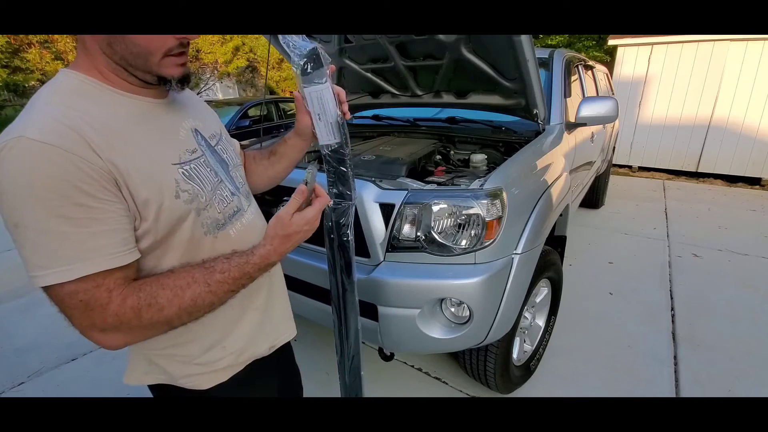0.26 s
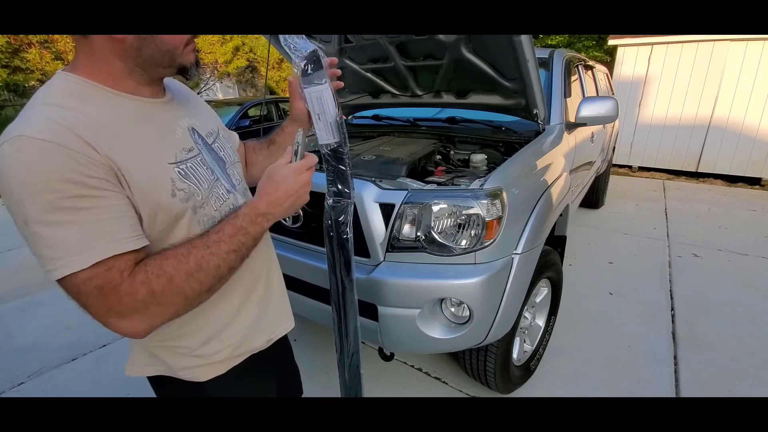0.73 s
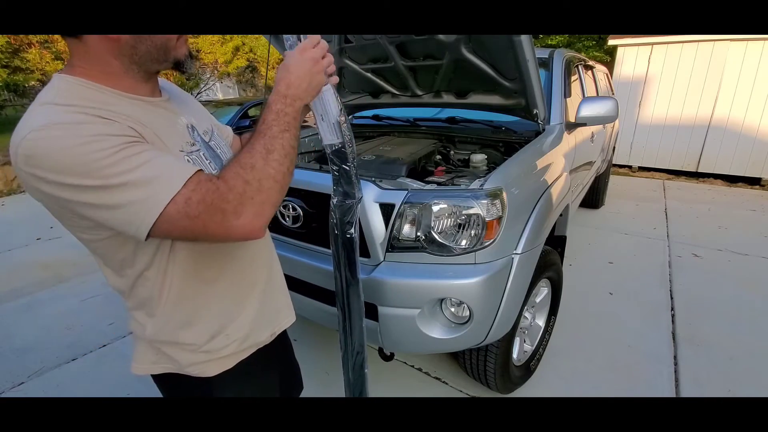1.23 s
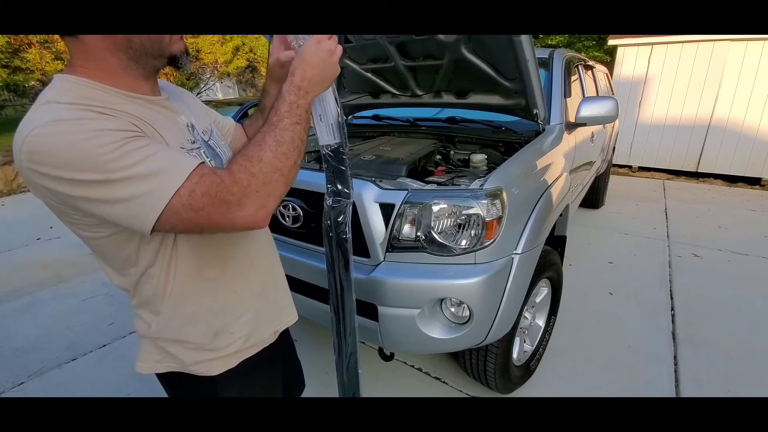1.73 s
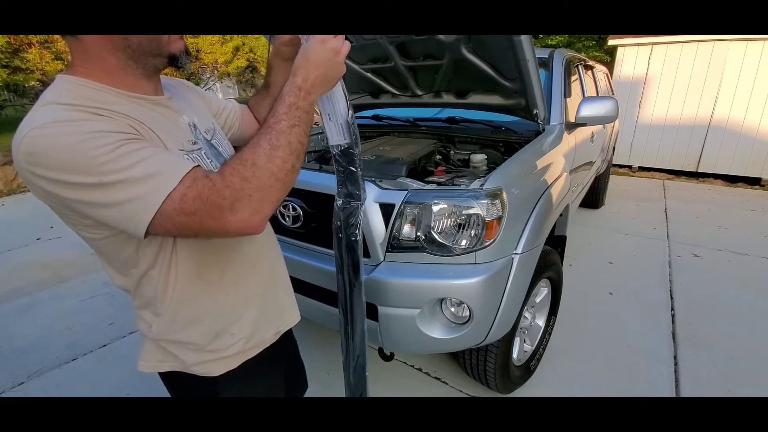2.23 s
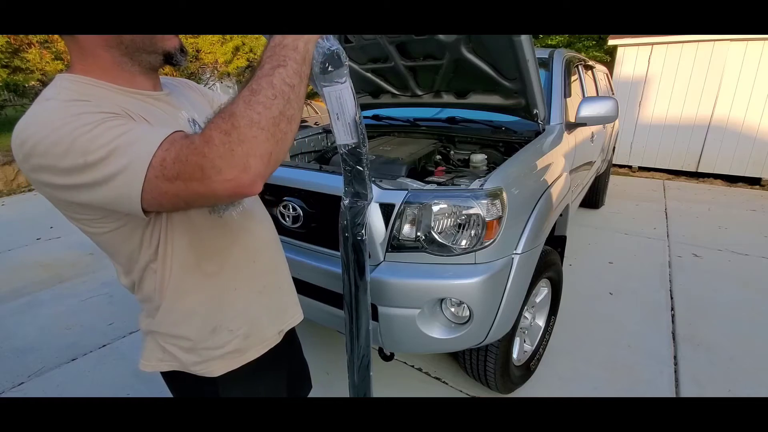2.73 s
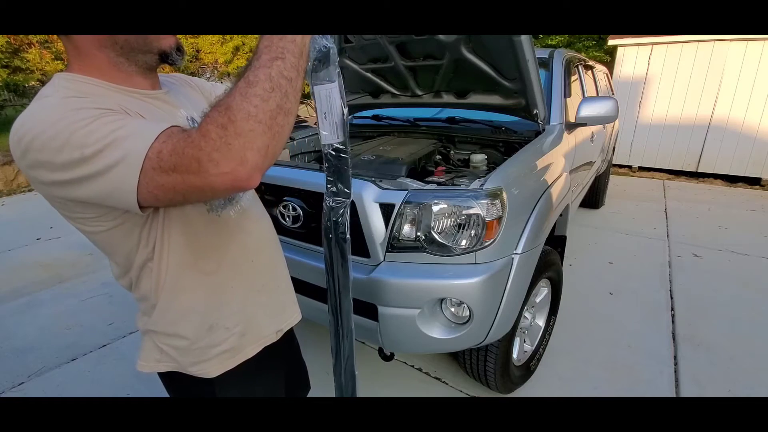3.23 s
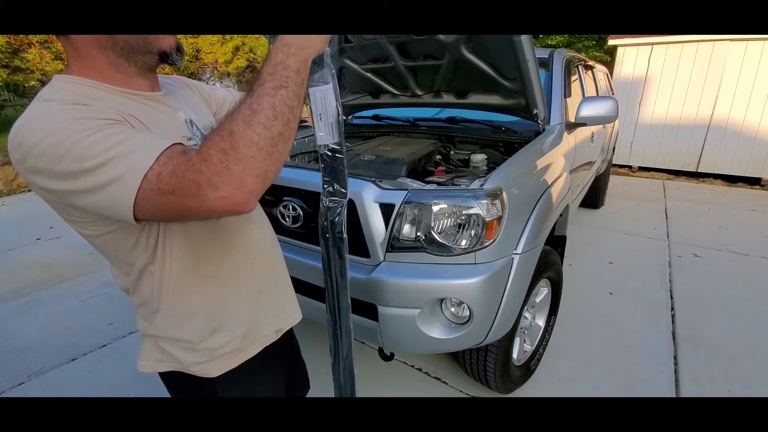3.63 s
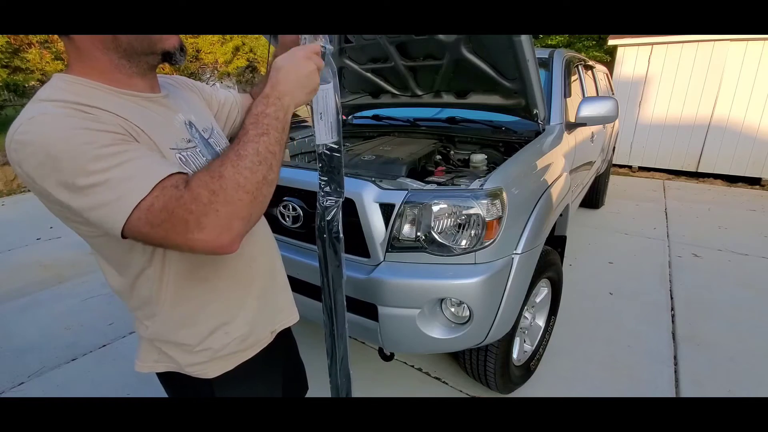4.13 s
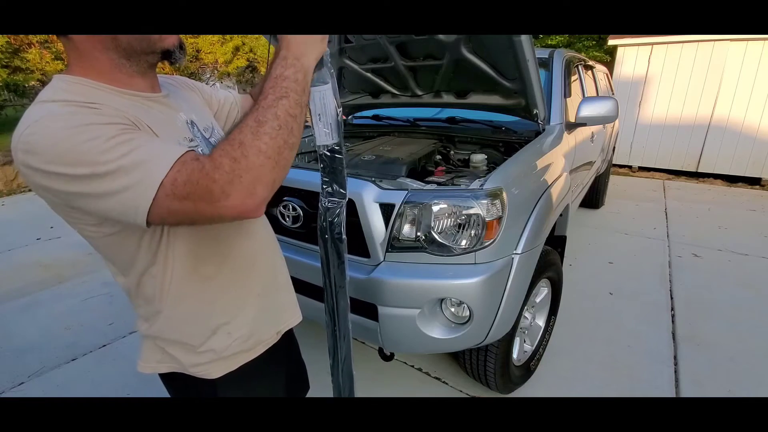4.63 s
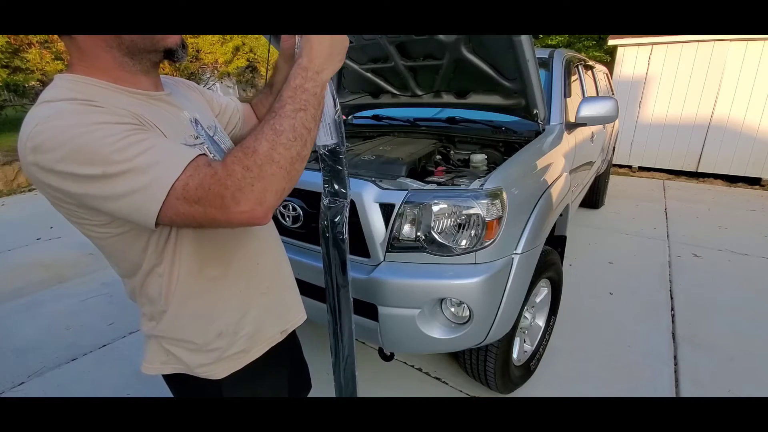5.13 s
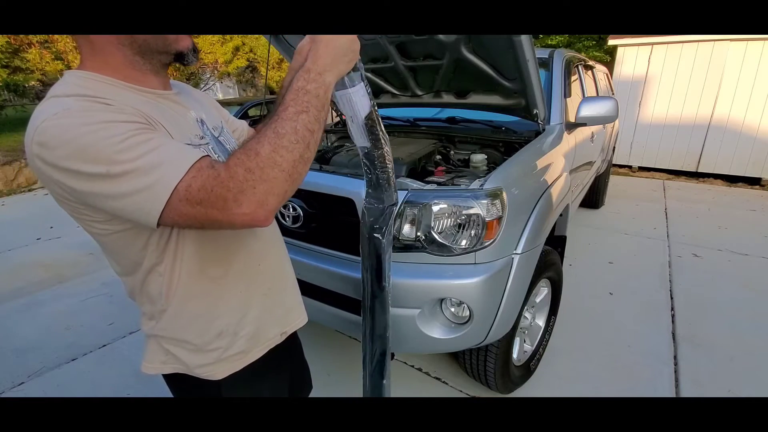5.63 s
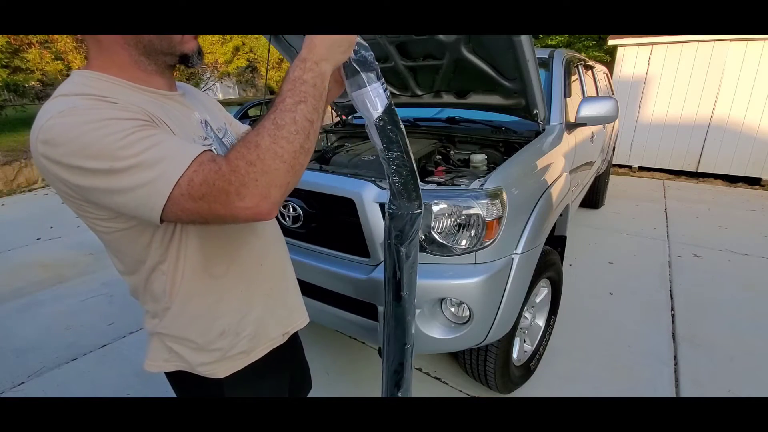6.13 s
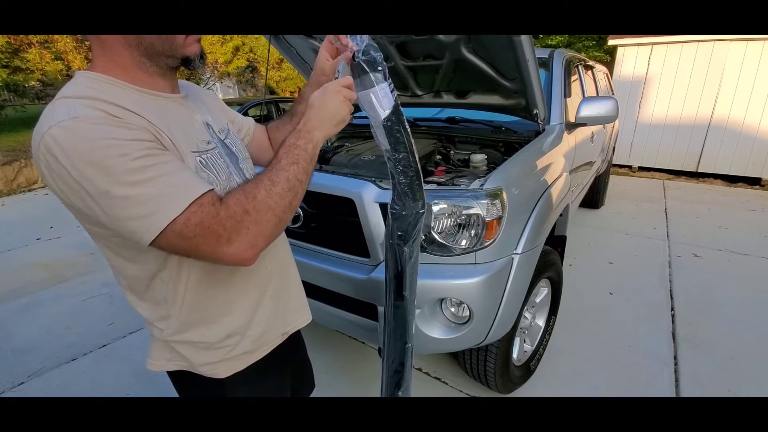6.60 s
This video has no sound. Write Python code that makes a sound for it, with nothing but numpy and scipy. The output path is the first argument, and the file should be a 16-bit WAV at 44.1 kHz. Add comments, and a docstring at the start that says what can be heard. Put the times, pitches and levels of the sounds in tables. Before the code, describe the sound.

Close, dry crinkling of thin plastic wrapping outdoors. A small metal tool clicks once in near quiet, then fingers grip the film and it bursts into dense crackle, sharp snaps and lower pops. Tugs follow one another with brief lulls and a few hollow bumps of the long plastic part, then the handling thins out. Faint insects and distant rumble lie beneath, in stereo with little echo.

```python
"""Driveway: hands work the thin plastic sleeve off the end of a long, stiff plastic part.
A small metal tool clicks: noise contacts through metal resonances. The bumped part rings as damped sines.
Creases flip in sharp snaps and dense crackle, larger facets pop lower: noise bursts through random resonances.
Car, concrete and wall scatter the sound as weak noise echoes.
Insects shrill in the trees over a faint distant rumble, both filtered noise; a faint wavering hum passes."""
import sys
import numpy as np
from scipy import signal
from scipy.fft import rfft, irfft, next_fast_len
from scipy.io import wavfile

SR = 44100
rng = np.random.default_rng(int(sys.argv[2]) if len(sys.argv) > 2 else 0)


def master(y):
    """Save y as 16-bit WAV."""
    cut = np.clip(np.atleast_2d(y).T, -1, 1)
    pcm = np.round(cut * 32767)  # scale
    wavfile.write(sys.argv[1], SR, pcm.astype(np.int16))


N = 302455

# squeezes or tugs of the fingers:
# [t/s, length/s, crackle level/dB rel., swell start to end/dB, flexing over crackle/dB rel.]
SQUEEZE_TABLE = [(.872, 0.21, -30.5, 1.5, 1), (1.076, 0.11, -36, -4.5, 1), (1.223, 0.096, -55.5, -9, 13.5),
                 (1.321, 0.12, -28, 5, -1), (1.471, 0.045, -36.5, -6.5, -1.5), (1.587, 0.077, -34, 4.5, -1),
                 (1.712, 0.11, -34, -7.5, 1.5), (1.851, 0.12, -31.5, 4.5, -4.5),
                 (1.974, 0.041, -22.5, 0, -5), (2.172, 0.15, -27.5, -1.5, -4), (2.438, 0.066, -41.5, 8, -2),
                 (2.596, 0.11, -26, 6.5, 2), (2.751, 0.14, -29, -6.5, 1.5), (2.896, 0.093, -32.5, 8.5, -3),
                 (3.079, 0.25, -27.5, 10, 0.5), (3.388, 0.12, -28.5, -2, 1), (3.599, 0.12, -26.5, 1, -2),
                 (3.826, 0.061, -37.5, 0.5, 1), (3.921, 0.11, -39.5, -5, -2.5),
                 (4.143, 0.045, -22.5, -3, 2), (4.595, 0.071, -42.5, -1, 9.5),
                 (4.689, 0.16, -31, 8.5, -0.5), (4.879, .18, -26.5, 15.5, -1.5),
                 (5.098, 0.056, -33, 0.5, 3.5), (5.204, 0.17, -24, 8, -0.5),
                 (5.416, 0.058, -35.5, 1.5, 3.5), (5.491, 0.14, -26.5, 5.5, -0.5),
                 (5.661, 0.095, -26, -4.5, 2.5), (5.758, 0.093, -22.5, -1, 0),
                 (5.901, 0.19, -30, -6.5, -3.5), (6.105, .16, -30.5, -8.5, -2.5),
                 (6.331, 0.24, -54.5, -2, 0), (6.722, 0.18, -37, 1, 5)]
# film colour when a crease cracks: [f/Hz, relative density/dB]
CRACK_COLOUR = [(400, -50), (1200, -14), (2300, 0), (4000, 0.5), (6500, -1.5), (8000, -4.5), (10000, -6),
                (13000, -2.5), (15500, -6.5)]
# film colour when a facet flexes: [f/Hz, relative density/dB]
FLEX_COLOUR = [(80, -23), (170, -17.5), (280, -12), (360, -6), (600, -4), (900, -2.5), (1250, 3), (1800, 1),
               (2600, -3), (5000, -19)]
# stereo width of diffuse sound: [f/Hz, side over mid level/dB]
SIDE_LEVEL = [(60, -16.5), (130, -17), (400, 2), (1200, -2), (3000, 4.5)]


def amp(db):
    """Decibels to gain."""
    return 10 ** (np.asarray(db) / 20)


def unit(x):
    """Scale to rms 1."""
    return x / np.sqrt(np.mean(x ** 2) + 1e-20)


def along(points, hz):
    """Interpolate (Hz, value) points on a log frequency axis."""
    f, v = np.transpose(points)
    return np.interp(np.log(hz + 1), np.log(f), v)


def filtered(x, response):
    """Multiply the spectrum of x by a function of frequency."""
    m = next_fast_len(N + SR // 2)
    gain = response(np.fft.rfftfreq(m, 1 / SR))
    return irfft(rfft(x, m) * gain, m)[..., :N]


def coloured(x, points, size=2048):
    """Minimum-phase filter, by folded cepstrum, that keeps the power of white noise."""
    gain = unit(amp(along(points, np.fft.rfftfreq(size, 1 / SR))))
    cepstrum = irfft(np.log(gain))
    cepstrum[1:size // 2] *= 2
    cepstrum[size // 2 + 1:] = 0
    impulse = irfft(np.exp(rfft(cepstrum)))
    return signal.fftconvolve(x, impulse[None], axes=1)[:, :N]


def diffuse():
    """White noise from all sides: alike at both microphones in the bass, unrelated in the treble."""
    mid, side = rng.standard_normal((2, N))
    side = filtered(side, lambda hz: amp(along(SIDE_LEVEL, hz)))
    return unit(np.array([mid + side, mid - side]))


def placed(times, waves):
    """Sum stereo waves (2, events, samples) at their times."""
    start = np.round(np.abs(times) * SR).astype(int)
    index = start[:, None] + np.arange(waves.shape[-1])
    return np.array([np.bincount(index.ravel(), w.ravel(), N)[:N] for w in waves])


def to_right(hz, events, lead_s=.00017, spread_s=.00003):
    """Phase of the path difference: sound reaches the right microphone a little after the left."""
    delay_s = lead_s + spread_s * rng.standard_normal((events, 1))
    return np.exp(-2j * np.pi * hz * delay_s)


def background(rumble_db=-50, insects_db=-53):
    """Distant rumble and steady insects as shaped diffuse noise; a passing hum of wavering pitch."""
    # distant rumble: [f/Hz, relative density/dB]
    rumble_colour = [(20, -11), (43, -1.5), (56, 8.5), (68, 2.5), (140, -5.5), (200, -10.5), (550, -11),
                     (1000, -15.5), (2800, -28), (15000, -39.5)]
    # insect chorus: [f/Hz, relative density/dB]
    insect_colour = [(4500, -45), (5800, -6), (6400, 9.5), (6800, 11), (7350, 9), (7600, 9), (7950, -2),
                     (9500, -58)]
    # far-off hum: [loudest t/s, Gaussian fade/s, f/Hz, rms waver/Hz, peak rms level/dB]
    hum_settings = (0.452, 0.55, 306, 7, -65)
    rumble = unit(filtered(diffuse(), lambda hz: amp(along(rumble_colour, hz))))
    insects = unit(filtered(diffuse(), lambda hz: amp(along(insect_colour, hz))))
    t = np.arange(N) / SR
    peak_s, fade_s, hum_hz, waver_hz, hum_db = hum_settings
    drift = unit(filtered(rng.standard_normal(N), lambda hz: np.exp(-hz / 10)))
    phase = 2 * np.pi * np.cumsum(hum_hz + waver_hz * drift) / SR
    swell = np.exp(-.5 * ((t - peak_s) / fade_s) ** 2)
    hum = amp(hum_db) * swell * unit(np.sin(phase))
    return amp(rumble_db) * rumble + amp(insects_db) * insects + hum


def bumps(octaves=0.35, stretch=0.097, relax_s=0.017, blur_hz=30):
    """Contacts ring nearby modes of the part; loose film blurs them, pitch sags as strain relaxes."""
    # hands and taut film bump the part: [t/s, level/dB rel., middle of excited band f/Hz]
    bump_table = [(.012, -38.5, 730), (.361, -45, 810), (.946, -28, 540), (1.111, -29, 480),
                  (1.353, -17.5, 1069), (2.712, -20, 1206), (3.204, -30, 406), (4.183, -29.5, 248.4),
                  (4.217, -22, 787), (5.043, -25.5, 372), (5.827, -30.5, 340), (6.535, -40, 969),
                  (6.589, -39.5, 820)]
    # modes of the long plastic part: [f/Hz, level/dB rel., t60/s]
    part_modes = [(202, -12, 0.1), (362, -1.5, 0.095), (472, -3.5, 0.19), (535, 5, 0.095),
                  (680, 10.5, 0.11), (786, 6, 0.081), (960, 18, 0.023), (1135, 12.5, 0.067),
                  (1293, 20.5, 0.031)]
    s, db, middle_hz = np.transpose(bump_table)
    t = np.arange(SR // 5) / SR
    sagging_t = t + stretch * relax_s * (1 - np.exp(-t / relax_s))  # pitch starts high by stretch
    blur_step = np.sqrt(blur_hz / (2 * np.pi * SR))
    ring = 0
    for hz, level_db, t60_s in part_modes:
        strength, detune, phase = rng.standard_normal((3, len(s), 1))
        wander = np.cumsum(rng.standard_normal((len(s), len(t))), axis=1)
        phase = phase + wander * blur_step
        excited = np.exp(-.5 * (np.log2(hz / middle_hz[:, None]) / octaves) ** 2)
        decay = amp(level_db + 1.1 * strength - 60 * t / t60_s)
        mode_hz = hz * (1 + 0.021 * detune)
        ring = ring + excited * decay * np.sin(2 * np.pi * (mode_hz * sagging_t + phase))
    ring = ring * (1 - np.exp(-t / 0.0017))  # soft onset
    ring *= (amp(db + 27.5) / np.linalg.norm(ring, axis=1))[:, None]
    shift = to_right(np.fft.rfftfreq(len(t), 1 / SR), len(s), lead_s=0.00029)
    right = irfft(rfft(ring) * shift, len(t))
    return placed(s, np.array([ring, right]))


def clicks(crack_t60_s=0.012, chatter_db=-12, chatter_s=0.019):
    """A sharp contact and its brief chatter, as noise, sound through the resonances of the metal."""
    # small metal tool in the hand: [t/s, level/dB rel., middle of excited band f/Hz, Gaussian width/octaves]
    click_table = [(0.203, -9, 4600, 1.9), (.438, -27, 3480, 0.18)]
    # resonances of the tool: [f/Hz, width/Hz, level/dB rel.]
    metal_modes = [(1590, 60, -3), (2040, 210, -7), (2530, 94, -4), (3470, 57, 0.5), (3880, 210, 0),
                   (4820, 330, -1.5), (5170, 480, -1), (6550, 51, 4), (7230, 410, -0.5), (11000, 3200, 0)]
    s, db, middle_hz, octaves = np.transpose(click_table)
    t = np.arange(SR // 8) / SR
    crack = amp(-60 * t / crack_t60_s)
    chatter = amp(chatter_db) * np.exp(-(t / chatter_s) ** 2)
    contact = (crack + chatter) * (1 - np.exp(-t / 0.00023))
    bursts = amp(db)[:, None] * contact * rng.standard_normal((2, len(s), len(t)))
    force = 0
    for k in range(len(s)):
        burst = placed(s[k:k + 1], bursts[:, k:k + 1])
        force = force + filtered(
            burst, lambda f: np.exp(-.5 * (np.log2((f + 1) / middle_hz[k]) / octaves[k]) ** 2))

    def metal(f):
        """Sum of the tool's resonances."""
        return sum(amp(level_db) * 1j * f * width / (hz * hz - f * f + 1j * f * width)
                   for hz, width, level_db in metal_modes)

    return filtered(force, metal)


def facets(events, hz, low_hz, high_hz, sharpness, mode_db, count, hump_db=0, tilt_db=2.1):
    """Random film facets: duller or brighter, a broad hump if hump_db, narrow resonances of Q sharpness."""
    response = np.ones((events, len(hz)), np.complex64)
    for _ in range(count):
        centre_hz = low_hz * (high_hz / low_hz) ** rng.random((events, 1))
        ratio = ((hz + 1) / centre_hz).astype(np.float32)
        strength = amp(mode_db) * rng.standard_normal((events, 1))
        response += strength / (1 + 1j * sharpness * (ratio - 1 / ratio))
    octave = np.clip(np.log2((hz + 1) / high_hz), -2, 1)
    middle_hz = np.sqrt(low_hz * high_hz)
    off_middle = np.log2((hz + 1) / middle_hz) - rng.uniform(-.7, .7, (events, 1))
    tilt = tilt_db * rng.standard_normal((events, 1)) * octave
    return response * amp(tilt + hump_db * np.exp(-2 * off_middle ** 2))


def flips(times, sizes, life_s, ring_db, ring_t60_s, modes, size, bounce_db=-13, bounce_s=.007):
    """Noise bursts, their bounce off the car and a diffuse decaying tail from the space around, coloured by the
    facets."""
    events, t, hz = len(times), np.arange(size) / SR, np.fft.rfftfreq(size, 1 / SR)
    u = t / (life_s * amp(4.4 * rng.standard_normal((events, 1))))  # each life varies around life_s
    burst, mid, side = rng.standard_normal((3, events, size), dtype=np.float32)
    burst = burst * u * np.exp(-np.minimum(u, 30))
    burst /= np.linalg.norm(burst, axis=1, keepdims=True)
    ring = (1 - np.exp(-t / 0.011)) * amp(-60 * t / ring_t60_s)
    ring *= 1 - (t / t[-1]) ** 2  # reach zero at the end
    ring *= amp(ring_db) / np.linalg.norm(ring)
    colour = facets(events, hz, **modes)
    delay_s = bounce_s * (1 + .12 * rng.standard_normal((events, 1)))
    bounce = amp(bounce_db) * np.exp(-2j * np.pi * hz * delay_s)
    mid = (rfft(burst) * (1 + bounce) + rfft(ring * mid)) * colour
    side = rfft(ring * side) * colour * amp(along(SIDE_LEVEL, hz))
    pair = irfft(np.array([mid + side, (mid - side) * to_right(hz, events)]), size)
    energy = np.mean(np.sum(pair ** 2, axis=2), axis=0)
    return placed(times, pair * (sizes / np.sqrt(energy))[:, None])


def snaps():
    """A crease cracks, and the facet around it pops through more slowly."""
    # big creases that snap through: [t/s, crack level/dB rel., facet pop level/dB rel.]
    snap_table = [(0.738, -43, -36.5), (0.85, -40, -28.5), (0.8726, -34, -21), (0.8802, -18.5, -42),
                  (0.9471, -12.5, -19), (0.969, -17, -41), (0.988, -20.5, -49), (1.0165, -12.5, -38),
                  (1.038, -8.5, -20.5), (1.1101, -16, -18), (1.135, -20, -24), (1.1646, -11.5, -24),
                  (1.25, -58, -27), (1.3216, -15, -24.5), (1.4104, -29.5, -35), (1.4294, -27, -24.5),
                  (1.4393, -21.5, -41), (1.551, -12, -25), (1.6176, -25, -31.5), (1.6317, -15.5, -30.5),
                  (1.6498, -18.5, -46), (1.711, -29, -23.5), (1.7726, -33, -40), (1.7864, -23.5, -29),
                  (1.833, -31.5, -61), (1.9127, -21.5, -43), (1.947, -25, -19), (1.9867, -21, -20.5),
                  (2.0003, -15, -22.5), (2.011, -22.5, -37), (2.0532, -15.5, -26), (2.0965, -25.5, -45),
                  (2.133, -29, -25), (2.18, -15.5, -44), (2.2706, -19, -40), (2.2996, -16.5, -21),
                  (2.3497, -21, -22), (2.401, -25.5, -37), (2.435, -26.5, -31), (2.483, -20, -30),
                  (2.559, -32, -34), (2.6017, -28, -27), (2.617, -15, -26), (2.6334, -14, -34),
                  (2.6753, -27, -24), (2.713, -11, -26), (2.72, -12, -27), (2.772, -26, -33),
                  (2.826, -12.5, -19), (2.8601, -25.5, -22), (2.888, -20.5, -41), (2.9089, -21, -34),
                  (2.9672, -19, -34.5), (2.984, -25, -31), (3.0502, -27.5, -25), (3.0778, -25, -17),
                  (3.114, -23, -56), (3.123, -25, -44), (3.204, -18, -34), (3.262, -20, -35),
                  (3.2861, -13.5, -19), (3.3542, -15, -40), (3.413, -22, -22), (3.474, -20, -36),
                  (3.5132, -26, -27.5), (3.553, -18.5, -24), (3.6069, -21, -52), (3.626, -17, -29),
                  (3.6814, -19.5, -19), (3.735, -24, -20), (3.833, -18, -38.5), (3.923, -32, -29.5),
                  (4.0207, -23, -20.5), (4.117, -34, -28.5), (4.145, -10, -19), (4.156, -11, -18),
                  (4.1821, -10.5, -15.5), (4.213, -18, -19.5), (4.3, -52, -30.5), (4.387, -28.5, -59),
                  (4.419, -28.5, -59), (4.5453, -28.5, -32.5), (4.5907, -27.5, -28), (4.628, -35, -34.5),
                  (4.6575, -29, -23), (4.693, -18, -25), (4.7243, -14.5, -32), (4.7384, -19, -19.5),
                  (4.766, -15.5, -34), (4.8191, -18, -22), (4.8878, -18, -32), (4.904, -14.5, -28.5),
                  (4.965, -17, -22), (5.002, -11.5, -32), (5.021, -12, -16), (5.028, -12.5, -24),
                  (5.053, -14, -28), (5.1053, -21.5, -47), (5.1544, -17, -20.5), (5.2099, -17, -23),
                  (5.277, -12, -43), (5.2922, -16, -27), (5.3134, -14.5, -27), (5.3615, -14.5, -16),
                  (5.4247, -22.5, -21), (5.495, -12, -20), (5.5207, -12.5, -24.5), (5.5664, -11, -44),
                  (5.579, -8, -30), (5.5951, -20, -20), (5.6204, -18, -29), (5.674, -23, -18),
                  (5.784, -18, -23), (5.9219, -15, -31), (5.9938, -36, -38), (6.037, -16, -29.5),
                  (6.1059, -24, -21), (6.1187, -15, -17.5), (6.1748, -30, -22), (6.216, -16, -34),
                  (6.2725, -26, -44), (6.447, -40.5, -38), (6.517, -33.5, -50), (6.7339, -27, -38),
                  (6.755, -35, -22.5), (6.822, -26.5, -23)]
    s, crack_db, pop_db = np.transpose(snap_table)
    cracks = flips(s, amp(crack_db + 20.0), life_s=0.00059, ring_db=-9.5, ring_t60_s=0.066, size=4096,
                   modes=dict(low_hz=1970, high_hz=9220, sharpness=61, mode_db=5, count=6, hump_db=4))
    pops = flips(s, amp(pop_db + 23), life_s=0.0011, ring_db=-2.5, ring_t60_s=0.074, size=4096,
                 modes=dict(low_hz=616, high_hz=2470, sharpness=12, mode_db=4.5, count=3))
    return coloured(cracks, CRACK_COLOUR) + coloured(pops, FLEX_COLOUR)


def swarm(squeeze_db, rate_hz, scatter_db, busy_db):
    """Random flips of unequal size follow each squeeze; below busy_db they thin out to single ticks."""
    # film gives at once under the fingers, settles more slowly when they stop
    grip_db_per_s, settle_db_per_s = 1802.5, 380.5
    start, length, _, swell_db, _ = np.transpose(SQUEEZE_TABLE)
    count = int(rate_hz * (N / SR - start[0]))
    times = start[0] + (np.arange(count) + rng.uniform(0, 2, count)) / rate_hz
    age = times[:, None] - start
    swell = swell_db * (np.clip(age / length, 0, 1) - .5)
    grip = grip_db_per_s * np.maximum(-age, 0)
    settle = settle_db_per_s * np.maximum(age - length, 0)
    level_db = (squeeze_db + swell - grip - settle).max(axis=1)  # loudest squeeze rules
    sizes = unit(amp(scatter_db * np.clip(rng.standard_normal(count), -3, 1.5)))
    share = np.clip(amp(level_db - busy_db), .3, 1)  # fraction of flips kept
    flipped = np.diff(np.floor(np.cumsum(share)), prepend=0)
    return times, flipped * sizes * amp(level_db) * np.sqrt(SR / (rate_hz * share))


def crumpling():
    """Countless small creases crackle while the sheet flexes."""
    _, _, crackle_db, _, flex_db = np.transpose(SQUEEZE_TABLE)
    creases = swarm(crackle_db - 0.5, rate_hz=230, scatter_db=5.5, busy_db=-26)
    crackle = flips(*creases, size=1024, life_s=.00045, ring_db=-7, ring_t60_s=.06,
                    modes=dict(low_hz=1660, high_hz=8050, sharpness=12, mode_db=3, count=3, hump_db=4))
    bends = swarm(crackle_db + flex_db - 3.5, rate_hz=160, scatter_db=4.5, busy_db=-33)
    flex = flips(*bends, size=1536, life_s=.0012, ring_db=-3, ring_t60_s=.08,
                 modes=dict(low_hz=639, high_hz=2444, sharpness=14, mode_db=5, count=3))
    return coloured(crackle, CRACK_COLOUR) + coloured(flex, FLEX_COLOUR)


def driveway(x, t60_s=0.24, delay_s=0.02):
    """Scattered echoes from the car, the concrete and the wall: a decaying noise tail of slow onset."""
    t = np.arange(SR // 3) / SR
    tail = rng.standard_normal((2, len(t))) * amp(-60 * t / t60_s) * (1 - np.exp(-(t / delay_s) ** 2))
    return signal.fftconvolve(x, tail / np.linalg.norm(tail[0]), axes=1)[:, :N]


def scene(echo_db=-20.5):
    """The handling, coloured differently at each microphone, in the open driveway."""
    # microphone difference for sound from this direction: [f/Hz, left minus right level/dB]
    mic_shade = [(150, -2.5), (450, 1), (1800, 3), (3600, -5), (5500, 2), (7800, 6), (10800, -3),
                 (15000, 4)]
    handling = bumps() + clicks() + snaps() + crumpling()
    handling = filtered(handling, lambda hz: amp(np.outer([.5, -.5], along(mic_shade, hz))))
    return background() + handling + amp(echo_db) * driveway(handling)


def record(dry):
    """Soft saturation rounds off the highest peaks; a steep low-pass sets the band limit."""
    top_hz = 15900
    rounded = dry / (1 + dry ** 6) ** (1 / 6)
    return filtered(rounded, lambda hz: 1 / (1 + (hz / top_hz) ** 100))


dry = scene()
out = record(dry)
master(out)
```